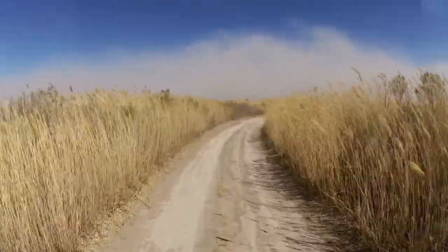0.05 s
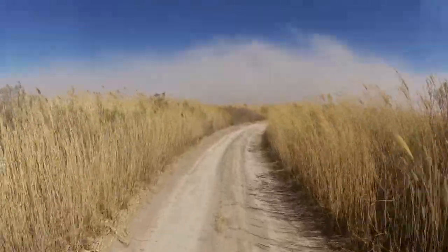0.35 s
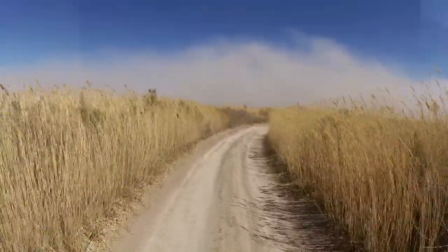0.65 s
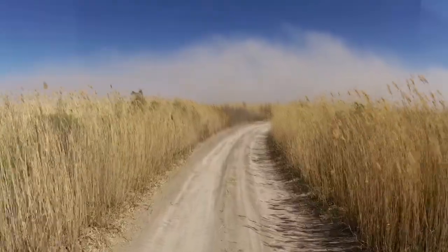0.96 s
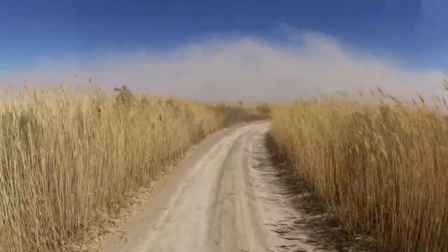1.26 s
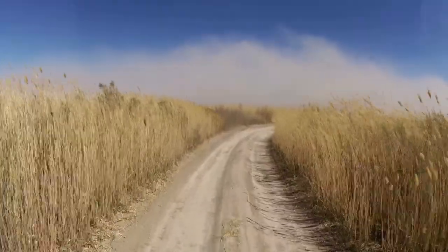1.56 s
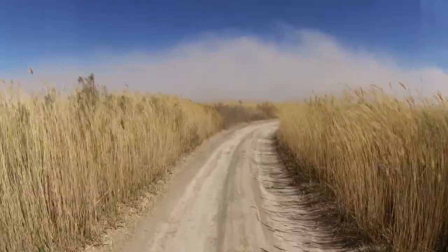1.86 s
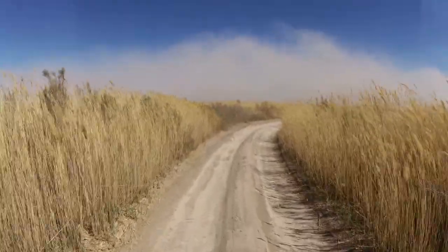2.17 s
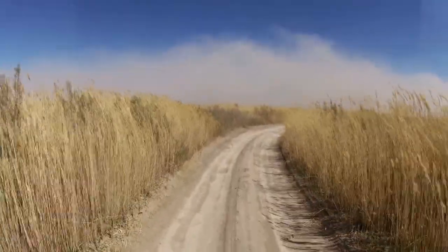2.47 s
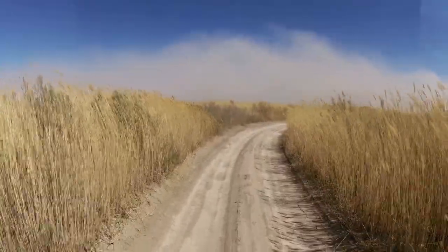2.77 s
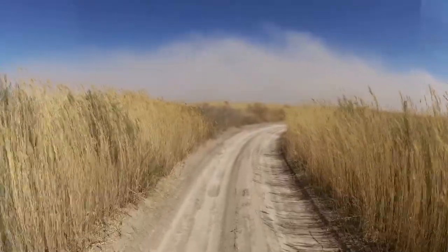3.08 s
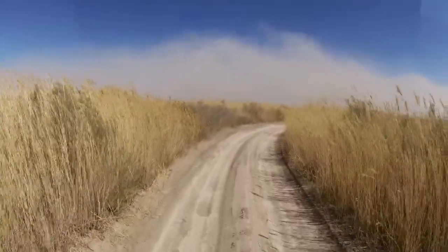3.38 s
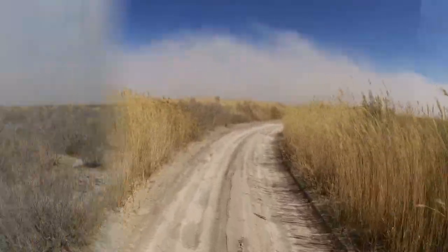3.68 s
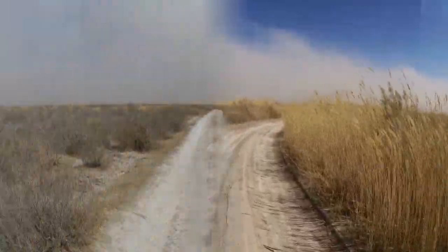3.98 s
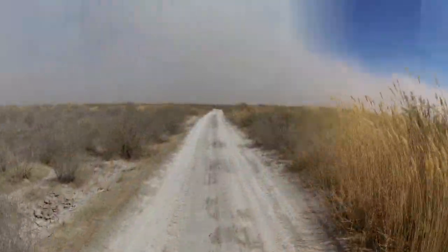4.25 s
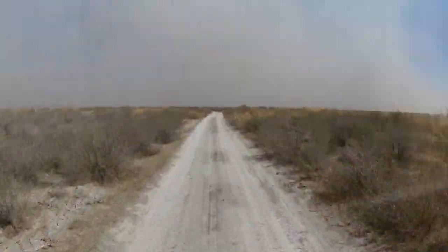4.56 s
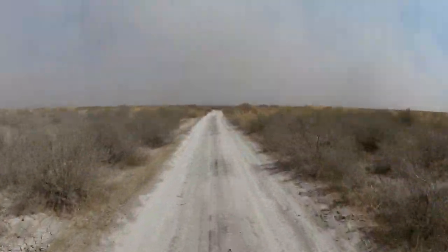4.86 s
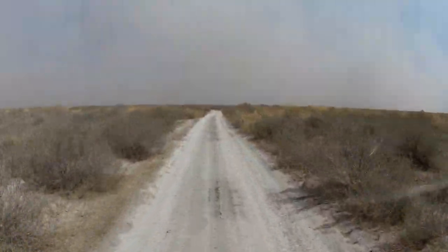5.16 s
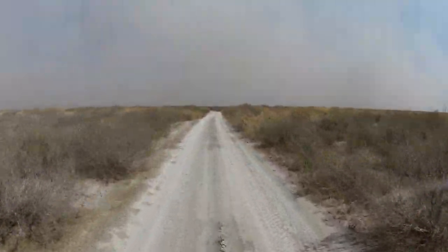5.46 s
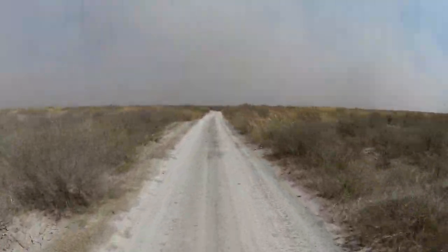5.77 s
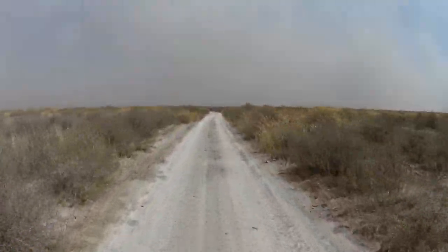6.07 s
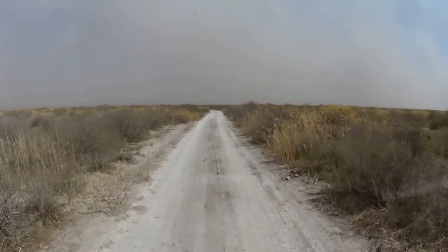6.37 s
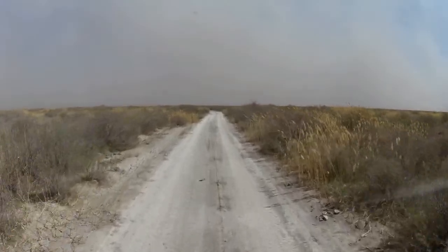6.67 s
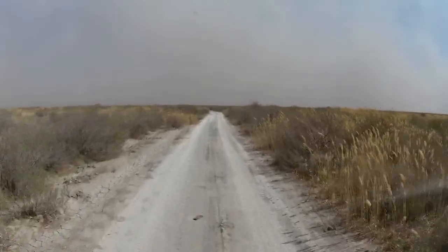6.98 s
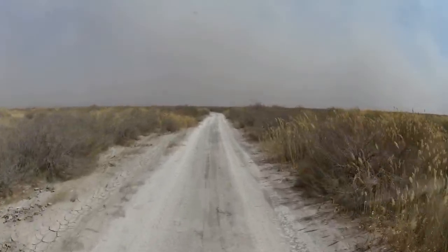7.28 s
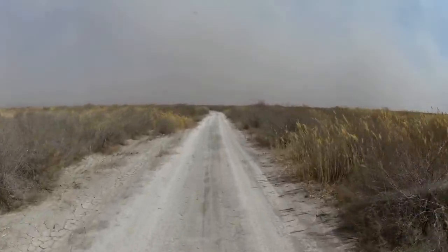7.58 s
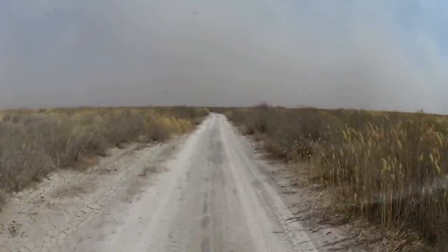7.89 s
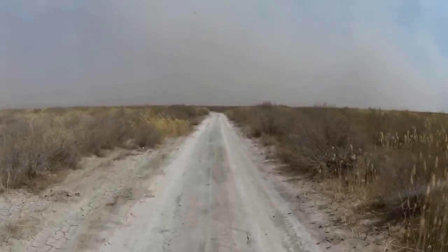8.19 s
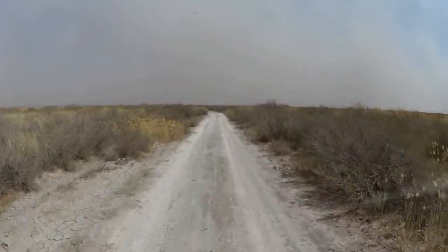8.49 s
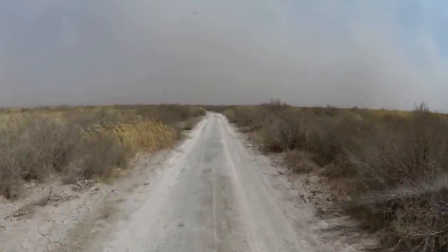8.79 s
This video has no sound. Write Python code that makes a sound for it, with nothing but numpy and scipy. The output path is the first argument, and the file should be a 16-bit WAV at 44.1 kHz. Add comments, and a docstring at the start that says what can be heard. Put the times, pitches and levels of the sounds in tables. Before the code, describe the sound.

A vehicle bumps along a rough dirt road, its engine humming low and its tyres rumbling over grit, picked up in the small, dry cabin. It opens with a cluster of thumps and rattles, followed by scattered knocks and plastic ticks. Near the middle a clicking dropout breaks the sound for an instant. The hum and rumble then return, with busier clatter from a loose fitting and more dull jolts.

```python
"""A drone of engine and drive line, over tyre rumble and crunching grit, fills a vehicle on a dirt track.
The drone is a sum of shaft orders; the road noise is random excitation filtered by the body. Impacts
excite damped modes: a loose fitting rattles, grates and knocks, plastic trim ticks, and ruts thump the
panels. The ride leads first between reeds, then over open scrub; between the two stretches the sound
drops out for an instant and fades back in."""
import sys
import numpy as np
from scipy import signal
from scipy.fft import rfft, irfft, next_fast_len
from scipy.io import wavfile
from scipy.ndimage import uniform_filter1d

SR = 44100
rng = np.random.default_rng(int(sys.argv[2]) if len(sys.argv) > 2 else 0)


def to_wav(s):
    """Save 16-bit WAV."""
    ch = np.atleast_2d(s).T  # columns
    pcm = np.round(np.clip(ch, -1, 1) * 32767)  # PCM
    wavfile.write(sys.argv[1], SR, pcm.astype(np.int16))


N = 398663
TIME = np.arange(N) / SR
SCRUB_START_S = 4.124
IN_REEDS = TIME < SCRUB_START_S
LEAD_S = .008   # parts begin to scuff this long before they hit


def from_db(db):
    """Amplitude ratio of a level in decibels."""
    return 10 ** (np.asarray(db) / 20)


def unit_power(x):
    """Normalisation to a mean square of one."""
    return x / np.sqrt(np.mean(x ** 2) + 1e-20)


def curve(rows):
    """Linear interpolation of (time, value) rows at every sample."""
    return np.interp(TIME, *np.transpose(rows))


def drift(corner_hz):
    """Low-pass filtered noise: a random wander of unit power."""
    step = 40   # samples per random value
    pole = np.exp(-2 * np.pi * corner_hz * step / SR)
    noise = rng.standard_normal(N // step + 2002)
    slow = signal.lfilter([1], [1, -2 * pole, pole * pole], noise)[2000:]
    return np.interp(np.arange(N) / step, np.arange(len(slow)), unit_power(slow))


def coloured(noise, spectrum):
    """Spectral shaping of a noise, at unit power."""
    hz, db = np.transpose(spectrum)
    size = next_fast_len(N)
    log_hz = np.log(np.arange(size // 2 + 1) * SR / size + 1)
    gain = from_db(np.interp(log_hz, np.log(hz), db))
    return unit_power(irfft(rfft(noise, size) * gain, size)[:N])


def add(track, s, sound):
    """Superposition of a short sound on a track at time s."""
    start = max(round(s * SR), 0)
    track[..., start:start + len(sound)] += sound[:max(N - start, 0)]


def drone(turns, orders, load_db, waver_db):
    """Rotational harmonics: each order is a wavering sinusoid at a multiple of the shaft rate."""
    out = np.zeros(N)
    for multiple, reeds_db, scrub_db in orders:
        level_db = np.where(IN_REEDS, reeds_db, scrub_db) + load_db + waver_db * drift(12)
        phase = 2 * np.pi * (multiple * turns + rng.random())
        out += np.sqrt(2) * from_db(level_db) * np.sin(phase)
    return out


def singing_panel(shaft_turns, load_db):
    """Forced vibration: a panel follows the fourth drive line order, and once sings out on its own."""
    swell_db = 10 * np.exp(-((TIME - 2.1) / 0.16) ** 2)
    level_db = np.where(IN_REEDS, -44, -52.5) + 2.6 * load_db + swell_db
    return np.sqrt(2) * from_db(level_db) * np.sin(2 * np.pi * 4 * shaft_turns)


# Drive line speed among the reeds: (time [s], rotation rate [Hz])
REED_SHAFT_SPEED = [(0, 68.5), (0.3, 66.4), (0.62, 69.3), (0.85, 65.6), (1.18, 66.9), (1.36, 66),
                    (1.58, 67.6), (1.87, 64.8), (2.25, 66.9), (2.9, 65), (3.19, 67.7), (3.45, 65.8),
                    (3.7, 68.1), (3.93, 66.3)]
# Engine orders at 0 dB load: (multiple of crank rate [1], level in reeds [dB], level in scrub [dB])
CRANK_ORDERS = [(2, -45.5, -43), (2.5, -48, -48.5), (3, -43, -40), (4, -52, -46), (5, -51.5, -49),
                (6, -43.5, -49.5), (8, -54, -53)]
# Drive line orders at 0 dB load: (multiple of shaft rate [1], level in reeds [dB], level in scrub [dB])
SHAFT_ORDERS = [(1, -41.5, -41.5), (2, -35.5, -49), (3.5, -59.5, -49)]
def power_train():
    """Gearing locks the drive line to the engine at a fixed ratio per stretch; both swell with load."""
    gear_ratio = np.where(IN_REEDS, 1.665, 1.595)   # shaft turns per crank turn
    reed_hz = curve(REED_SHAFT_SPEED)
    scrub_s = TIME - SCRUB_START_S
    crank_hz = np.where(IN_REEDS, reed_hz / gear_ratio, 40 + .17 * scrub_s)
    crank_hz *= 1 + 0.00539 * drift(10.8)   # uneven ground tugs at the wheels
    # among the reeds the load runs 24 ms ahead of each surge in pace
    surge_hz = np.interp(TIME + 0.024, TIME, reed_hz) - reed_hz[IN_REEDS].mean()
    load_db = np.where(IN_REEDS, 1.5 * np.tanh(surge_hz / 0.66), 1.2 + 0.39 * scrub_s)
    crank_turns = np.cumsum(crank_hz) / SR
    shaft_turns = np.cumsum(crank_hz * gear_ratio) / SR
    engine = drone(crank_turns, CRANK_ORDERS, load_db, waver_db=2.5)
    drive_line = drone(shaft_turns, SHAFT_ORDERS, load_db, waver_db=1.04)
    return engine + drive_line + singing_panel(shaft_turns, load_db)


# Boom of the body: (frequency [Hz], relative spectral density [dB])
BOOM_SPECTRUM = [(18, -31), (26, -1), (34, -6), (46, 0.5), (60, -2), (90, -3), (140, 5), (175, 0.5),
                 (230, -30), (400, -72)]
# Rumble of the tyres: (frequency [Hz], relative spectral density [dB])
RUMBLE_SPECTRUM = [(100, -15), (175, -12.5), (205, 1.5), (275, 2.5), (320, -2), (470, -5), (550, -9.5),
                   (650, -15.5), (810, -15), (930, -31), (1400, -39.5), (3000, -78)]
def tyres(rumble_db):
    """Structure-borne noise: the body booms on its springs and carries the lumpy tyre rumble."""
    boom_db = np.where(IN_REEDS, -42, -41) + 2.3 * drift(2.6)
    boom = from_db(boom_db) * coloured(rng.standard_normal(N), BOOM_SPECTRUM)
    lumps = rng.standard_normal(N) * from_db(2 * drift(29))
    return boom + from_db(rumble_db) * coloured(lumps, RUMBLE_SPECTRUM)


# Grit as muffled by the cabin: (frequency [Hz], relative spectral density [dB])
GRIT_SPECTRUM = [(400, -13.5), (830, 7), (940, 5.5), (1120, 1.5), (1380, 3.5), (1560, 0), (1750, -1),
                 (1980, -4), (2350, 0.5), (2720, -1), (2950, -4.5), (3250, -9.5), (3550, -18.5),
                 (4000, -18.5), (4300, -23), (6000, -31.5), (9000, -41), (15500, -55.5)]
def grit(grit_db):
    """Amplitude-modulated noise: grit crunches under the tyres in quick spurts of single stones."""
    spurts = rng.standard_normal(N) * from_db(1.5 * drift(20))
    stones = from_db(1.7 * drift(500))
    return from_db(grit_db) * coloured(spurts * stones, GRIT_SPECTRUM)


def impact(modes, tilt_db, scatter_db, scuff_db, tilt_hz=(1000, 2600)):
    """Modal response to a contact at LEAD_S, of fixed energy; tilt_db is per octave across tilt_hz."""
    hz, db, width_hz = np.transpose(modes)[:, :, None]
    size = 4096
    bin_hz = np.arange(size // 2 + 1) * SR / size
    # strength and pitch of each mode depend on where the parts meet
    octaves = np.log2(np.clip(hz, *tilt_hz) / tilt_hz[0])
    strength = from_db(db + tilt_db * octaves + scatter_db * rng.standard_normal(hz.shape))
    hz = hz * (1 + .012 * rng.standard_normal(hz.shape))
    power = np.sum(strength ** 2 / (1 + ((bin_hz - hz) / width_hz) ** 2) ** 3, axis=0)
    # minimum phase: all modes start at the contact and decay after it
    cepstrum = irfft(np.log(power))[:size // 2]
    log_spectrum = rfft(np.r_[0, cepstrum[1:]], size)
    ring = irfft(np.exp(log_spectrum))[:size // 2]
    # the force is an impulse, with scuffing before it and chatter after it
    lag_s = TIME[:SR // 30] - LEAD_S
    envelope = np.exp(np.where(lag_s < 0, lag_s / .0018, -lag_s / .0033))
    scuff = rng.standard_normal(len(lag_s)) * envelope
    force = from_db(scuff_db) * scuff / np.linalg.norm(scuff)
    force[round(LEAD_S * SR)] += 1
    sound = signal.fftconvolve(force, ring)
    return sound / np.linalg.norm(sound) * np.sqrt(SR / 160)


# Modes of the loose fitting: (frequency [Hz], relative level [dB], width [Hz])
FITTING_MODES = [(833, 5, 65), (1103, 6.5, 112), (1266, 1, 100), (1445, -0.5, 45), (1732, 4, 150),
                 (2120, -3.5, 220), (2370, -2, 390), (2700, -5.5, 160), (3230, -20, 330),
                 (4140, -33.5, 230), (4700, -37.5, 350)]
def rattle(peak_db, spread_db, count):
    """Random impacts: the fitting jiggles faintly in its seat, no two taps alike."""
    out = np.zeros(N)
    for when, softness, brightness in rng.random((count, 3)):
        at = int(when * N)
        tap = impact(FITTING_MODES, tilt_db=10 * (brightness - .5), scatter_db=2.5, scuff_db=3)
        add(out, at / SR, from_db(peak_db[at] - spread_db * softness) * tap)
    return out


# Slips of the fitting: (time [s], level [dB])
FITTING_SLIPS = [(0.088, -38), (0.118, -39), (0.16, -42), (0.175, -38), (0.463, -40), (0.847, -39.5),
                 (1.433, -36.5), (1.446, -37.5), (1.88, -40), (4.463, -41.5), (5.239, -38), (5.257, -35.5),
                 (6.014, -42), (6.36, -39), (6.438, -38.5), (6.495, -39), (6.645, -35.5), (7.383, -39.5),
                 (7.454, -36), (7.733, -35.5), (7.814, -37), (8.077, -36), (8.42, -43), (8.702, -40.5),
                 (8.786, -37.5)]
def scrapes(length_s):
    """Sliding friction: a dense run of tiny contacts swells and dies, driving the fitting's modes."""
    out = np.zeros(N)
    swell = signal.windows.hann(int(length_s * SR))
    for s, db in FITTING_SLIPS:
        contacts = rng.standard_normal(SR // 10)[:len(swell)] * swell
        ring = impact(FITTING_MODES, tilt_db=-2, scatter_db=1, scuff_db=-11.5)
        grate = signal.fftconvolve(contacts, ring)
        grate *= np.sqrt(len(swell) / 3) / np.linalg.norm(grate)
        add(out, s - length_s / 2 - LEAD_S, from_db(db) * grate)
    return out


# Modes of the hard plastic trim: (frequency [Hz], relative level [dB], width [Hz])
TRIM_MODES = [(1560, 5, 250), (2000, -4.5, 180), (2580, 8.5, 270), (3130, 0, 250), (3760, -15, 280),
              (4500, -22, 320), (4920, -23, 420), (5670, -37.5, 990)]
# Hits on the trim: (time [s], level [dB])
TRIM_HITS = [(0.101, -36), (0.1106, -25.5), (0.1237, -43), (0.159, -43), (0.179, -41), (0.193, -42.5),
             (0.2083, -38), (0.798, -39.5), (1.181, -41.5), (1.468, -47), (1.953, -47.5), (2.723, -52.5),
             (2.848, -45), (2.957, -51), (3.128, -45.5), (3.398, -38), (3.443, -45.5), (3.746, -45),
             (3.928, -43), (3.962, -43), (3.973, -44), (6.666, -39.5), (7.304, -40)]
def ticks():
    """Nonlinear contact: the trim ticks more brightly as the energy of the hit rises."""
    out = np.zeros(N)
    for s, db in TRIM_HITS:
        force = from_db(db)
        tilt_db = 5900 * force ** 2
        tick = impact(TRIM_MODES, tilt_db, scatter_db=2.5, scuff_db=-3.5, tilt_hz=(2600, 3700))
        add(out, s - LEAD_S, force * tick)
    return out


# Modes of the body panels: (frequency [Hz], relative level [dB], width [Hz])
PANEL_MODES = [(257, -6.5, 74), (358, -3, 43), (437, 2.5, 77), (606, -9, 120), (800, -1, 66)]
# Jolts from ruts, before cushioning: (time [s], level [dB])
RUT_JOLTS = [(0.114, -26), (0.161, -26.5), (0.196, -23), (0.213, -24), (0.265, -30), (1.179, -28.5),
             (1.709, -28), (1.971, -28), (2.795, -29.5), (2.85, -30), (3.997, -22.5), (4.308, -21),
             (5.323, -31), (6.326, -32), (6.416, -28.5), (6.489, -26), (6.685, -23), (6.733, -27.5),
             (7.095, -28.5), (7.318, -26), (7.738, -25.5), (7.871, -29), (8.14, -29)]
def thumps():
    """Shock excitation: ruts jolt the body panels, and the tyres cushion the blow as a low-pass filter."""
    out = np.zeros(N)
    for s, db in RUT_JOLTS:
        add(out, s - LEAD_S, from_db(db) * impact(PANEL_MODES, tilt_db=0, scatter_db=-2, scuff_db=-10))
    return signal.sosfilt(signal.butter(4, 625, fs=SR, output="sos"), out)


# Blows of the fitting on its seat: (time [s], level [dB], spectral tilt [dB/octave])
FITTING_BLOWS = [(0.132, -34.5, -4), (0.147, -35, -4), (0.194, -33.5, -13), (0.403, -32.5, -1.5),
                 (0.513, -39, 1.5), (0.564, -40, 0), (0.648, -43, 2), (0.705, -40.5, -9.5),
                 (0.879, -47, -5), (0.921, -46, 1), (1.324, -39.5, -5), (1.37, -35, -3), (1.51, -44, 3.5),
                 (1.71, -38, 2.5), (1.84, -33.5, 11), (2.762, -46, -4), (2.795, -40, -4), (2.968, -39, -3),
                 (3.093, -42, -7.5), (3.484, -39, 5), (3.576, -41, 1), (3.666, -37.5, -4.5),
                 (4.307, -27, -2), (4.48, -35, -6), (4.63, -39.5, 0), (4.638, -35, 5), (4.685, -44, 6),
                 (5.072, -36, 3), (5.085, -33.5, 3), (5.144, -33.5, -0.5), (5.322, -36.5, -10),
                 (5.332, -37, -13), (5.496, -45, 2), (5.751, -39, 1.5), (5.836, -42, -2),
                 (5.936, -39.5, -1), (5.964, -48.5, -3), (6.118, -38, 8), (6.301, -44.5, -2),
                 (6.352, -35, 0.5), (6.363, -37.5, 10), (6.422, -28, 9), (6.537, -41, 3), (6.62, -35.5, 6),
                 (6.673, -28, 9), (6.737, -31.5, 3), (6.95, -37, 1), (6.98, -40.5, -2), (7.096, -35, -5),
                 (7.254, -40.5, 0), (7.427, -42, 1), (7.474, -47, 5), (7.511, -40.5, -1),
                 (7.574, -36.5, -1), (7.661, -33, -3), (7.718, -43, -1), (7.873, -38.5, -4),
                 (7.881, -39, 1.5), (7.939, -35, 1.5), (7.982, -41, 1), (7.998, -38.5, -1),
                 (8.023, -33.5, 1), (8.051, -38, 3), (8.252, -39.5, 5.5), (8.403, -40.5, 2),
                 (8.542, -40.5, -4), (8.602, -44, -6), (8.947, -32, 3), (8.96, -43, -2)]
def knocks():
    """Damped free vibration: the loose fitting strikes its seat and rings briefly."""
    out = np.zeros(N)
    for s, db, tilt_db in FITTING_BLOWS:
        add(out, s - LEAD_S, from_db(db) * impact(FITTING_MODES, tilt_db, scatter_db=0.5, scuff_db=-10))
    return out


def cabin(direct, t60_s, reverb_db):
    """Reverberation: dense reflections die quickly in a small upholstered space."""
    t = TIME[:SR // 8]
    tail = rng.standard_normal(len(t)) * from_db(-60 * t / t60_s) * (t > .002)
    return direct + from_db(reverb_db) * signal.fftconvolve(direct, tail / np.linalg.norm(tail))[:N]


# Roughness of the track: (time [s], relative level [dB])
TRACK_ROUGHNESS = [(0.03, 1.5), (0.19, 4), (0.9, -1), (1.25, 0.5), (2.65, -2.5), (3.8, 0.5), (4.02, 2.5),
                   (4.7, -2), (5.5, -0.5), (6.2, -1.5), (7.35, 0), (9.04, -1)]
def scene():
    """Superposition in the cabin; rough ground raises rumble, grit and rattle together."""
    rough_db = curve(TRACK_ROUGHNESS)
    rumble_db, grit_db = -34.5 + 0.79 * rough_db, -51.5 + rough_db
    loose_parts = knocks() + ticks() + scrapes(length_s=0.022)
    loose_parts += rattle(peak_db=grit_db + 7, spread_db=4, count=190)
    running_noise = power_train() + tyres(rumble_db) + grit(grit_db)
    return (running_noise + cabin(loose_parts + thumps(), t60_s=.055, reverb_db=-13))[None]


# Fade into the scrub stretch: (time [s], gain [dB])
SCRUB_FADE = [(4.124, -28), (4.16, -17), (4.2, -13.5), (4.25, -5), (4.31, 0)]
def record(dry):
    """Gating and band limiting: a brief dropout, a fade-in, a click at each edge, and the top cut off."""
    off_s, on_s, cutoff_hz = 4.085, 4.103, 15800
    live = (TIME < off_s) | (TIME > on_s)
    fade = np.where(IN_REEDS, 1, from_db(curve(SCRUB_FADE)))
    out = dry * uniform_filter1d(np.where(live, fade, from_db(-53)), size=45)
    click = 0.036 * np.exp(-TIME[:SR // 100] / 0.00082)
    for s in (off_s, on_s, SCRUB_START_S):
        add(out, s, click)
    return signal.sosfilt(signal.ellip(10, .1, 80, cutoff_hz, fs=SR, output="sos"), out)


dry = scene()
out = record(dry)
to_wav(out)
```